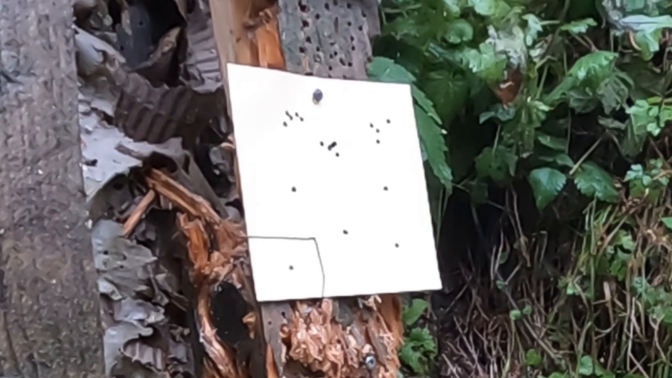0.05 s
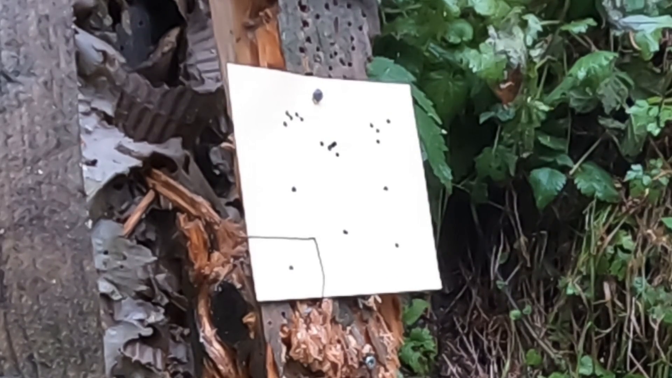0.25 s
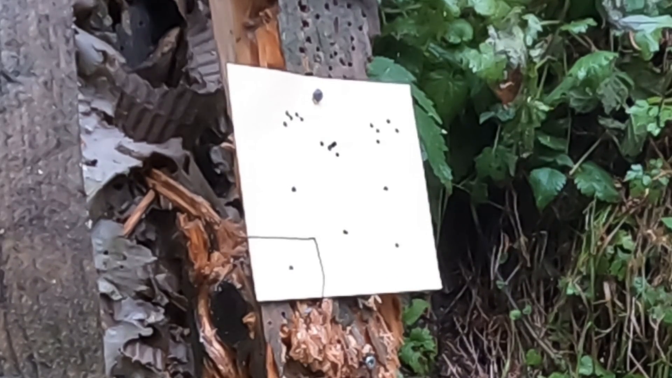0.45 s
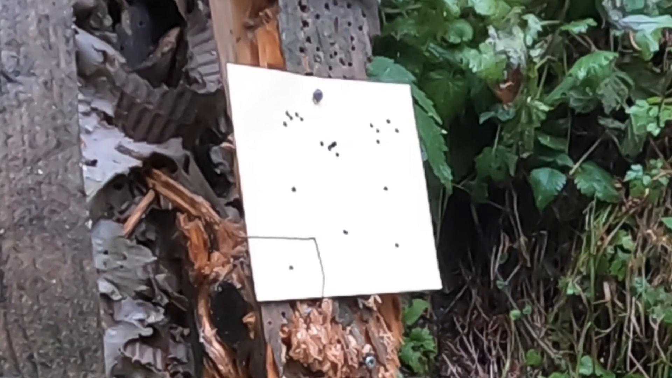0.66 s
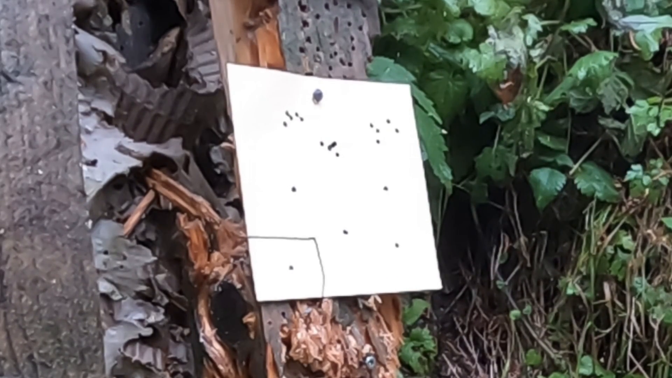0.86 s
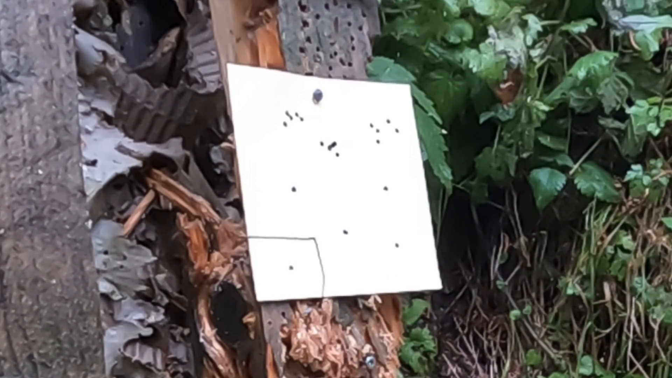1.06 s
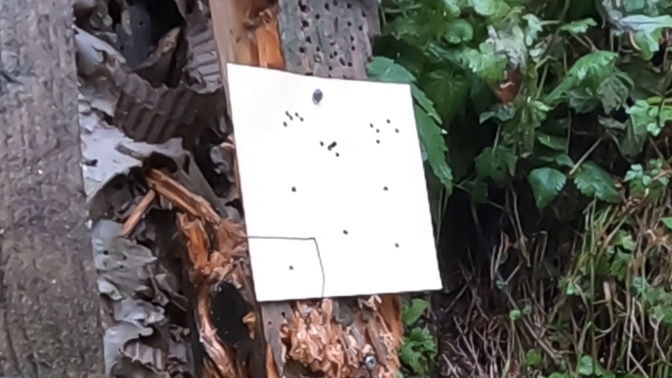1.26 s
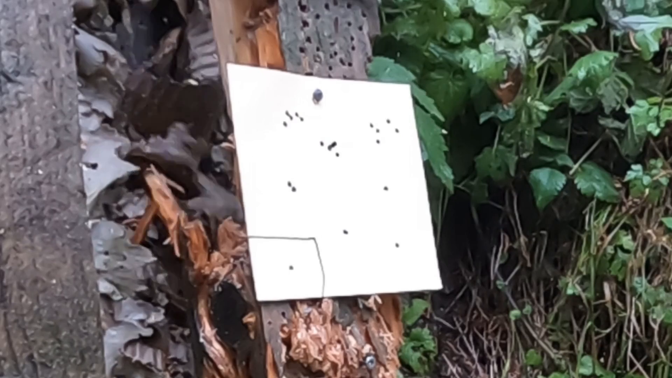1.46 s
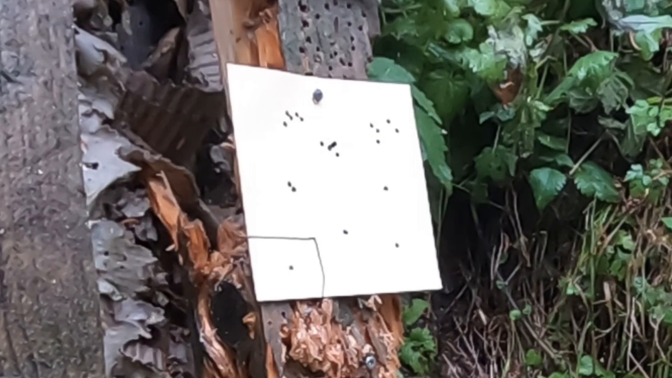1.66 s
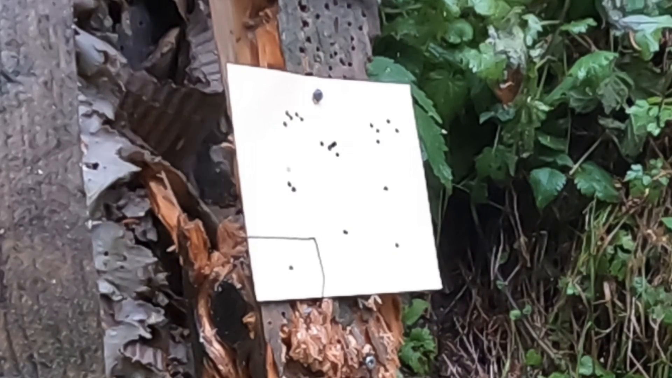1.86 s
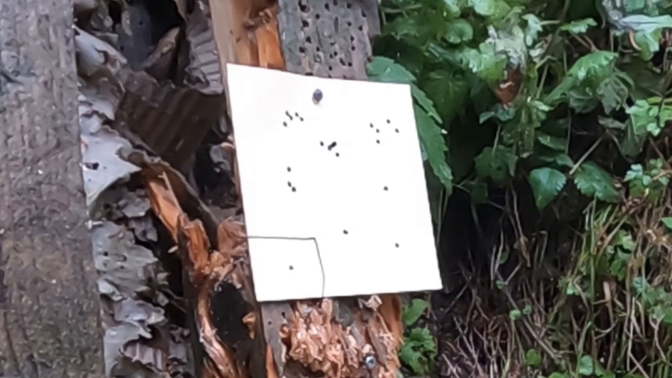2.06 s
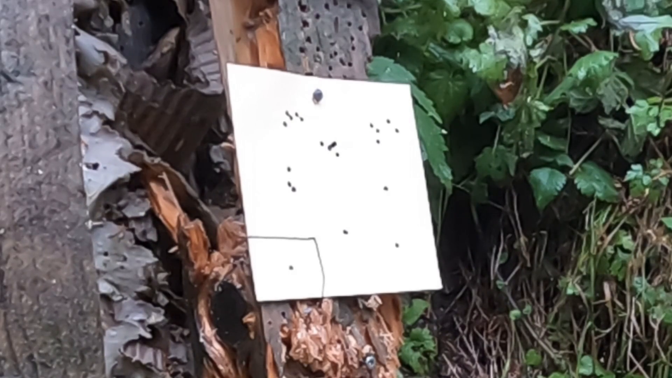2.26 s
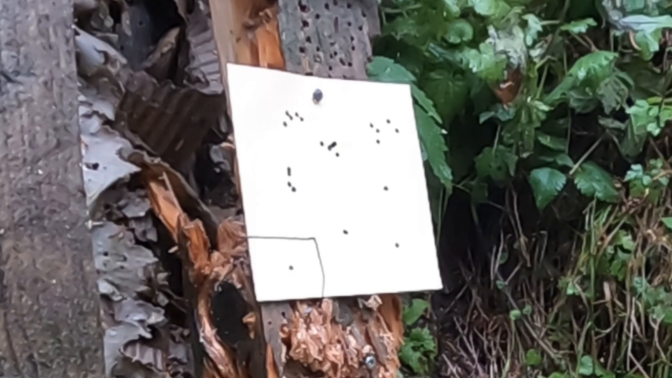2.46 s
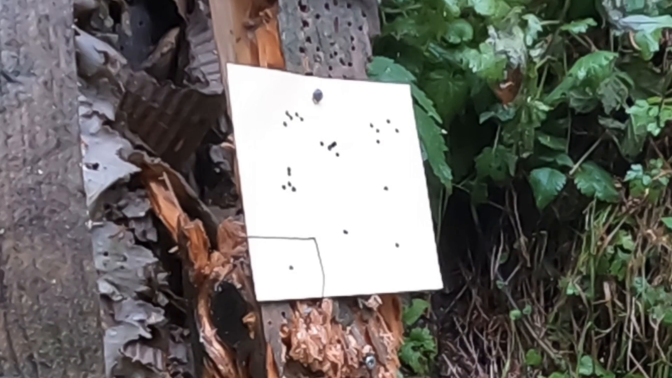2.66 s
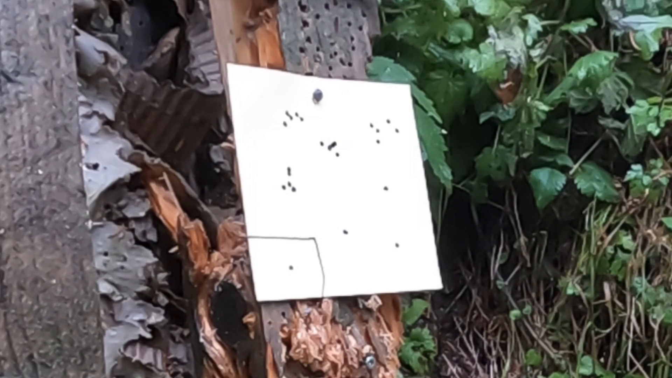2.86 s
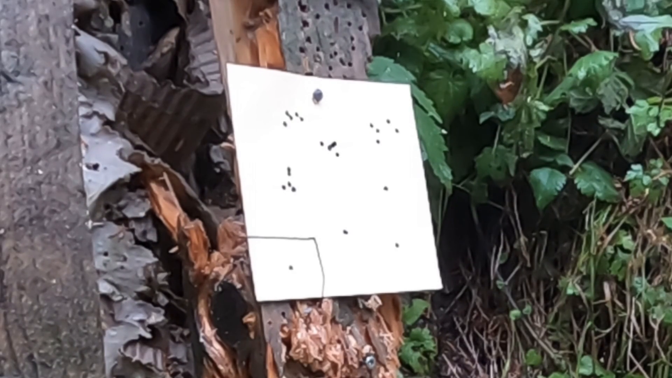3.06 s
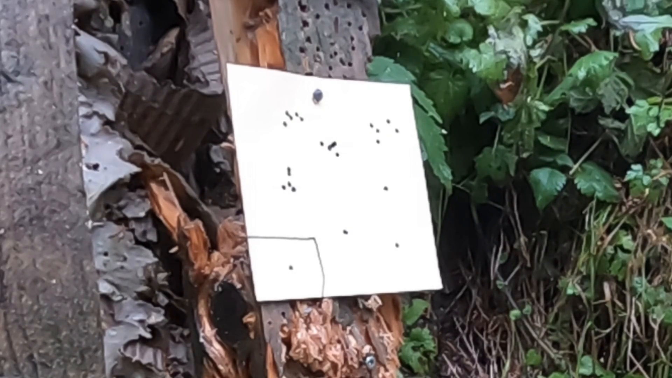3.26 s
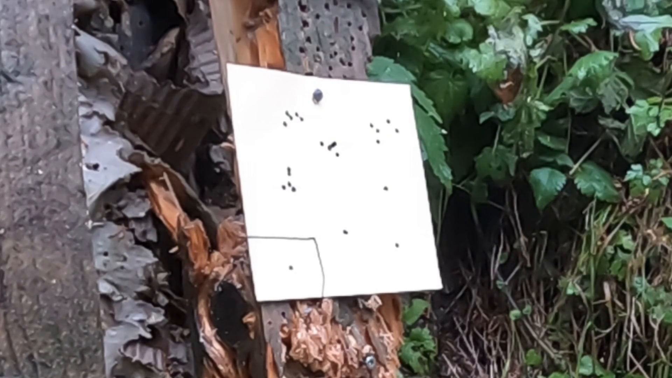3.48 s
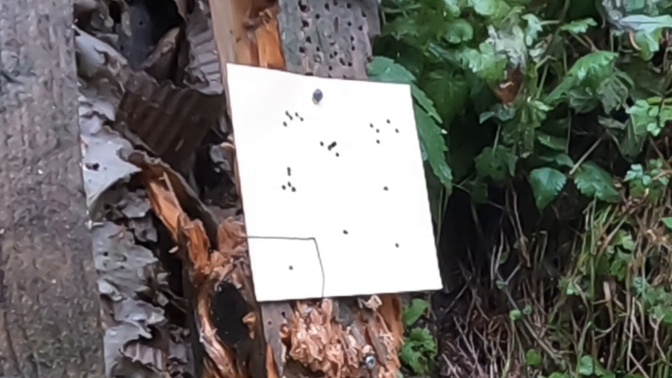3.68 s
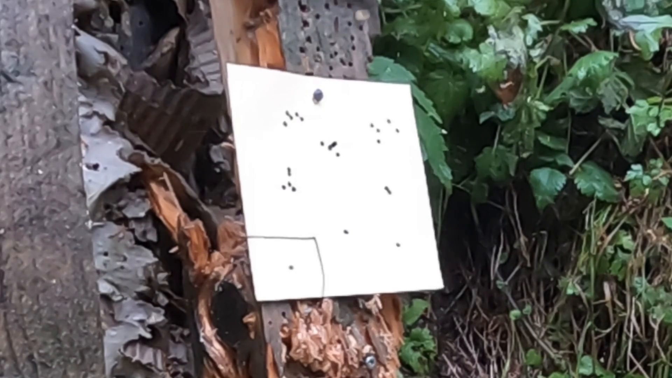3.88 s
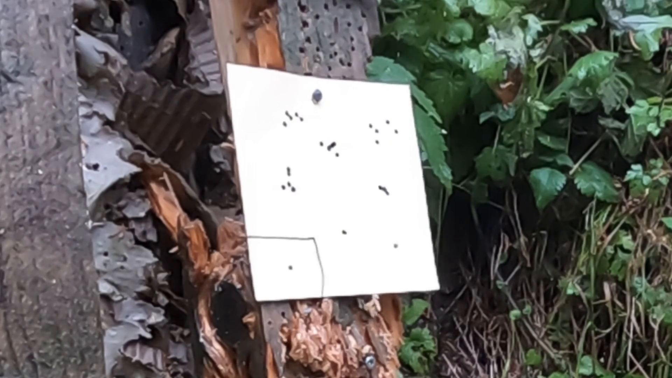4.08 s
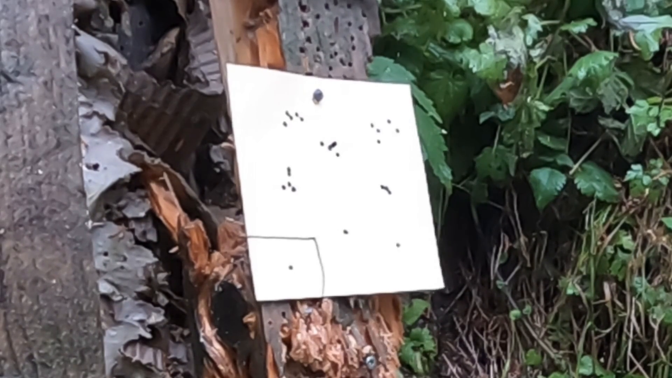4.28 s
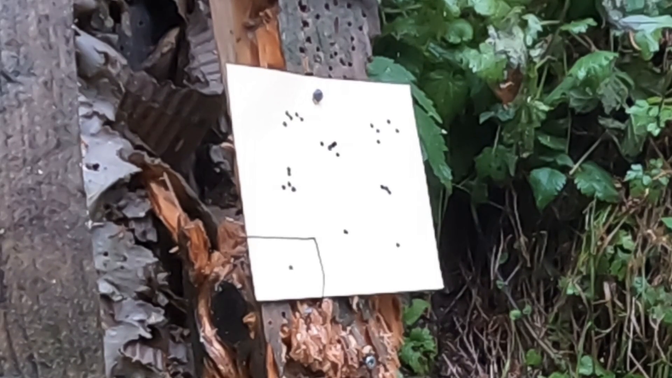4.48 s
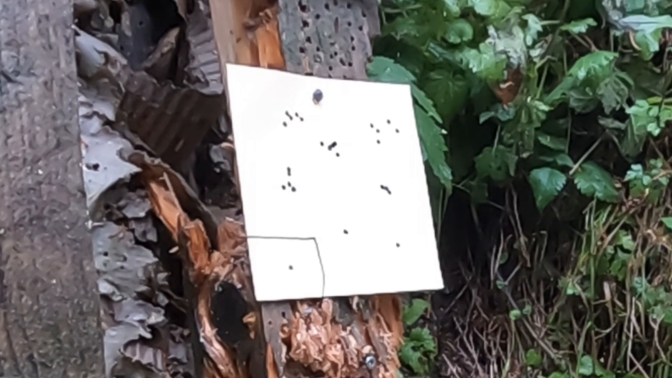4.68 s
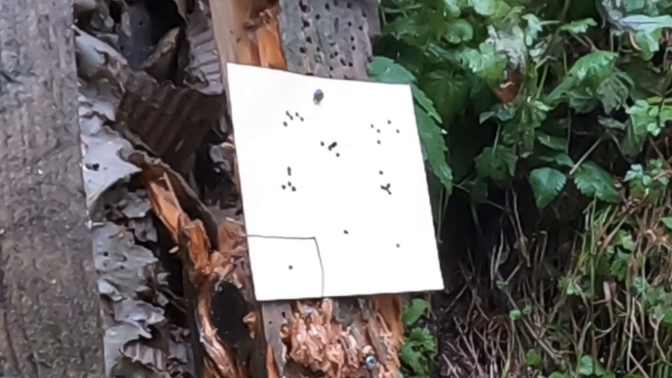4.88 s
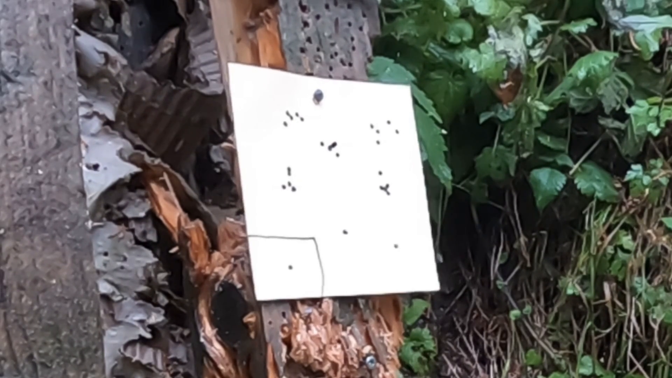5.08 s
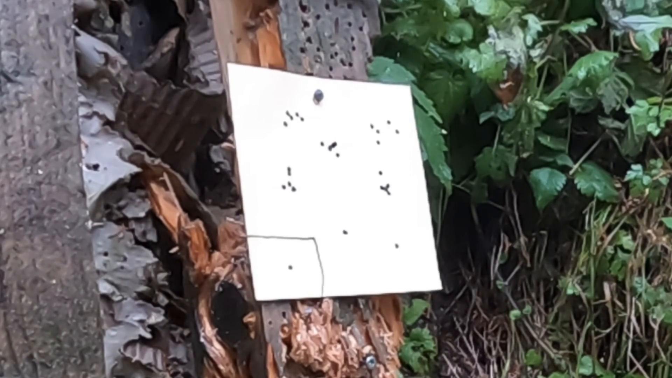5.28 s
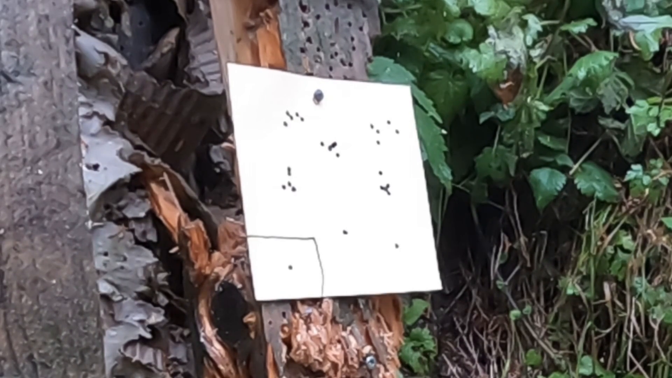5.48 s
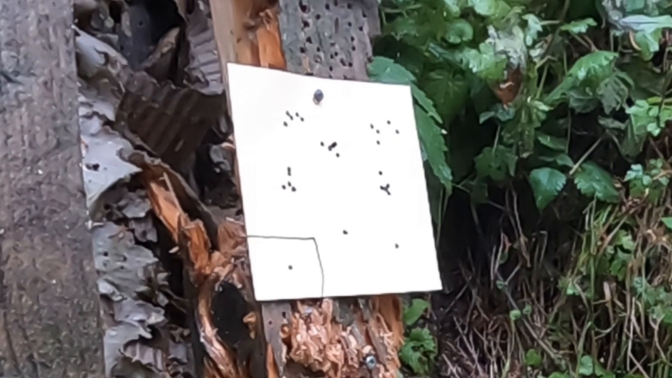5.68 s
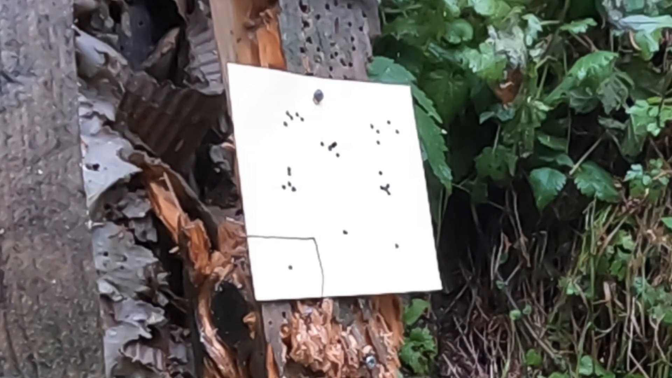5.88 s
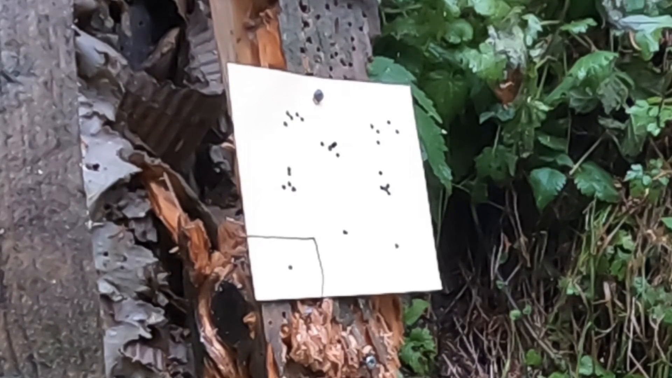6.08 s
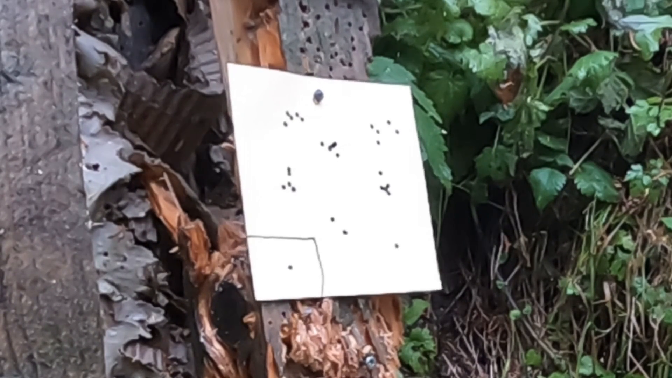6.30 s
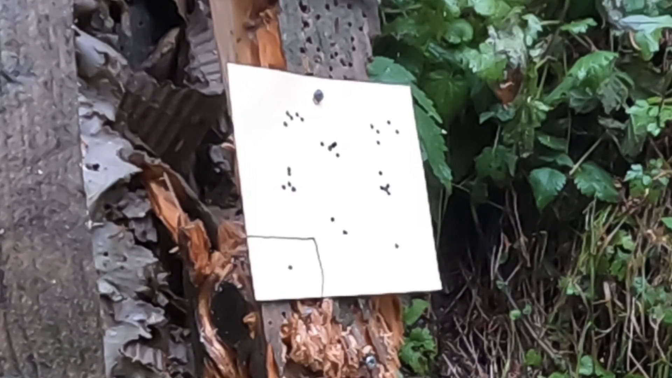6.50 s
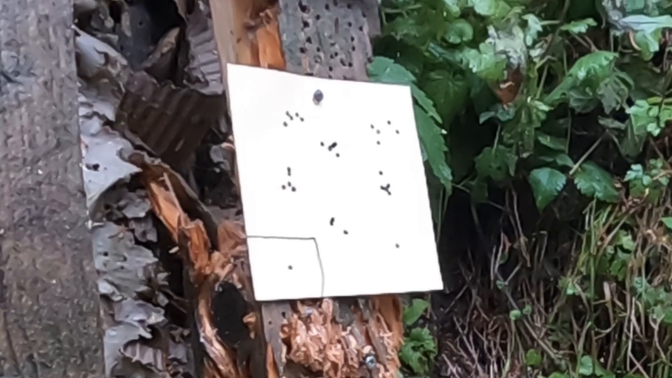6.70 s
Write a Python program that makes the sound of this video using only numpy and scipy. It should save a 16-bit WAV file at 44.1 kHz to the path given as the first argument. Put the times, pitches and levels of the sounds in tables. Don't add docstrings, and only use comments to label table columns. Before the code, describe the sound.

Outdoors by a wood, low traffic rumble and a faint leafy hush open the scene. Then nine air rifle pellets hit a card on a wooden post, unevenly spaced. Each is a small muzzle click followed almost at once by a loud, dry, splitting smack and a bright rustling echo from trees. The microphone is close to the post and overloads; background dips after hits and cuts abruptly.

```python
import sys
import numpy as np
from scipy import signal
from scipy.fft import rfft, irfft
from scipy.io import wavfile
from scipy.ndimage import uniform_filter1d

SR = 44100
rng = np.random.default_rng(int(sys.argv[2]) if len(sys.argv) > 2 else 0)


def to_wav(sig):
    pcm = np.clip(np.atleast_2d(sig), -1, 1) * 32767
    pcm = np.round(pcm).astype(np.int16)
    wavfile.write(sys.argv[1], SR, pcm.T)


def decibels_to_gain(level_db):
    exponent = np.asarray(level_db, float) / 20
    return 10 ** exponent


N = 297234
LEAD_S = 0.0098


# (pitch [Hz], level [dB], t60 [s])
POST_MODES = [(2060, -9, 0.0024), (2687, -5.5, 0.017), (3342, 3, .012), (3990, -1.5, 0.0045),
              (5085, -2.5, 0.01), (5980, -1.5, .008), (7128, 2, 0.0094), (8240, -7, 0.0018),
              (9800, -8.5, 0.0059), (10950, -7, 0.023)]


def smack(wood_hz, wood_db, card_db, split_db, spray):
    knocks = np.zeros(round(.06 * SR))
    at = np.sort(rng.integers(10, 180, size=9))
    splits = rng.uniform(0.057, 1.0, size=9) * rng.choice([-1, 1], size=9)
    knocks[[0, *at]] = [-1.6, *splits]
    knocks[round(.003 * SR)] = -2.0
    knocks[1:] *= decibels_to_gain(split_db)
    snap = knocks * (np.arange(len(knocks)) == 0)

    wood = np.array([ring(knocks, wood_hz * share, 0.03) for share in rng.uniform(.93, 1.1, size=2)])
    thud = ring(snap, wood_hz * 1.2, .003) - decibels_to_gain(-4.0) * ring(snap, wood_hz * 1.95, 0.0035)
    wood = decibels_to_gain(-2.5) * wood + decibels_to_gain(7.5) * thud
    wood[0] = np.roll(wood[0], round(.00007 * SR))

    out = decibels_to_gain(wood_db) * wood + decibels_to_gain(-1.0 + card_db + split_db) * spray
    out = out + decibels_to_gain(1.5) * ring(snap, 4500, 0.0012)
    out = out + decibels_to_gain(-1.0) * ring(snap, 9500, 0.0015) * decibels_to_gain([[2.5], [-2.5]])
    for hz, level_db, t60 in POST_MODES:
        chance_db = np.clip(rng.normal(0, 1.5, size=(2, 1)), -4, 4)
        out = out + decibels_to_gain(level_db - 10.5 + card_db + chance_db) * ring(knocks, hz, t60)

    bark = decibels_to_gain(-16.5) * ring(knocks, 520, 0.047)
    hollow = np.array([np.roll(bark, round(0.00041 * SR)), bark])
    return band(band(out, 1100, 10000), 860, 16000) + hollow


OPEN_DB, REACT_S, CRUSH_DB, CRUSH_S, FALL_DB_PER_S = 1, 0.00054, 37, .006, 618.5


def crush_db(t):
    late = np.maximum(t - REACT_S, 0)
    return OPEN_DB - CRUSH_DB * (1 - np.exp(-late / CRUSH_S)) - FALL_DB_PER_S * late


# (time [s], peak [dB], wood pitch [Hz], wood level [dB], card level [dB])
PELLET_HITS = [
    (1.5112, -3, 1346, -6, -0.8),
    (1.996, -3.5, 1006, 3.5, 1.5),
    (2.509, -8.5, 1461, -11, 0.9),
    (2.7846, -4.5, 1036, -1.5, -0.45),
    (3.9170, -7, 1431, 0, -1.5),
    (4.2031, -5.5, 1455, -2.5, 0.5),
    (4.9604, -7, 1698, -0.5, -3),
    (6.2403, -5.5, 1458, -2, -2),
    (6.7285, -4.5, 1553, -2.5, -1.5),
]
# (frequency [Hz], level [dB per Hz])
SPRAY_SPECTRUM = [(350, -31), (600, -12.5), (1230, -2), (2710, -8.5), (3880, -9), (5480, -7.5),
                  (7320, -7.5), (7850, -12.5), (11400, -12.5), (16300, -40)]
# (frequency [Hz], level [dB per Hz])
SMEAR_SPECTRUM = [(290, -30), (500, 0.5), (660, -6.5), (3330, -6), (4460, -9.5), (5470, -8), (7760, -5.5),
                  (8980, -11.5), (13300, -15), (16300, -37)]
# (frequency [Hz], level [dB per Hz])
WOBBLE_SPECTRUM = [(50, -20.5), (90, -6), (170, -5.5), (235, -2.5), (255, -29)]
WOBBLE_DB, SMEAR_DB = -27.5, -28.5


def pellets():
    direct, ghost = np.zeros((2, 2, N))
    recoil, smear, faint, wobble = np.zeros((4, N))
    spray = noise(SPRAY_SPECTRUM, alike=0.52)
    for k, (s, peak_db, wood_hz, wood_db, card_db) in enumerate(PELLET_HITS):
        recoil_db, copy_db, split_db = SHOTS[k][1:]
        own_spray = spray[:, k * 4000:][:, :round(.06 * SR)]
        sound = smack(wood_hz, wood_db, card_db, split_db, own_spray)
        add(direct, decibels_to_gain(peak_db) * sound, s)
        add(recoil, -decibels_to_gain(recoil_db) * np.hanning(round(.0068 * SR)), s + 0.00027)
        add(wobble, decibels_to_gain(WOBBLE_DB) * np.hanning(round(.024 * SR)), s - .017)
        early = band(sound[:, :round(LEAD_S * SR)], 980, 4000) * fade(0.024, LEAD_S)
        add(ghost, decibels_to_gain(copy_db) * early, s - LEAD_S)
        add(ghost, decibels_to_gain(copy_db - 12.5) * early, s - 2 * LEAD_S)
        add(smear, decibels_to_gain(SMEAR_DB) * fade(-0.08, LEAD_S), s - LEAD_S)
        add(faint, decibels_to_gain(SMEAR_DB - 13.0) * fade(-0.048, LEAD_S), s - 2 * LEAD_S)
        add(faint, decibels_to_gain(SMEAR_DB - 18.5) * fade(-.3, 2 * LEAD_S), s - 4 * LEAD_S)
    squeeze = after_hits(crush_db, rest_db=-200)
    haze = noise(SMEAR_SPECTRUM, alike=0.33)
    bright = (squeeze * direct + ghost + smear * haze + edge(faint * haze)) * decibels_to_gain([[1.1], [-1.1]])
    return bright + recoil + wobble * noise(WOBBLE_SPECTRUM, alike=0.42)


# (muzzle click time [s], post recoil [dB], early smack copy [dB], wood splitting [dB])
SHOTS = [
    (1.4656, -14.5, -20.5, -0.5),
    (1.9506, -10.5, -24, 1.5),
    (2.463, -14.5, -27.5, 1),
    (2.7399, -11, -30.5, 4.5),
    (3.8725, -16.5, -23.5, -5.5),
    (4.1582, -11.5, -29.5, -1),
    (4.9145, -17, -23.5, -2),
    (6.1962, -16, -32, -1.5),
    (6.6843, -15.5, -26, -2.5),
]
# (frequency [Hz], level [dB per Hz])
SCATTER_SPECTRUM = [(470, -42.5), (800, -21), (1260, -3), (1860, -11), (3590, 0), (7560, -5), (9020, -23),
                    (12100, -18.5), (13700, -29.5), (16300, -80)]
MUZZLE_DB = -19
CUT_SHOT_S, CUT_SHOT_DB = .3642, -48


def muzzles():
    clicks, scatter = np.zeros(N), np.zeros(N)
    for s, *_ in SHOTS:
        for lag_s, echo_db in [(0, 0), (.003, -6.), (-LEAD_S, -27.)]:
            clicks[round((s + lag_s) * SR)] -= decibels_to_gain(MUZZLE_DB + echo_db - 2.0)
        add(scatter, decibels_to_gain(MUZZLE_DB - 17.0) * fade(0.12, 0.038), s + 0.00084)
        add(scatter, decibels_to_gain(MUZZLE_DB - 45.5) * fade(4.9, LEAD_S), s - LEAD_S)
        add(scatter, decibels_to_gain(MUZZLE_DB - 45.0) * fade(9., LEAD_S), s - 2 * LEAD_S)
    clicks[round(CUT_SHOT_S * SR)] -= decibels_to_gain(CUT_SHOT_DB)
    clicks[round((CUT_SHOT_S - LEAD_S) * SR)] -= decibels_to_gain(CUT_SHOT_DB - 15.0)
    crack = decibels_to_gain(3.0) * ring(clicks, 4600, 0.0018) + decibels_to_gain(-31.0) * ring(clicks, 1300, 0.0018)
    return (band(crack, 500, 8000) + scatter * noise(SCATTER_SPECTRUM, alike=0.69)) * decibels_to_gain([[2.2], [-2.2]])


TREES_DB, NEAR_DB, NEAR_S, THIN_DB_PER_S = -59, -11.5, .012, 15
CLEARING_S, CLEARING_WIDE_S, CLEARING_DB = .055, 0.01, 3.5


def echo_db(t):
    clearing = np.exp(-((t - CLEARING_S) / CLEARING_WIDE_S) ** 2)
    return TREES_DB + NEAR_DB * np.exp(-t / NEAR_S) - THIN_DB_PER_S * t - CLEARING_DB * clearing


# (frequency [Hz], level [dB per Hz])
TREE_SPECTRUM = [(790, -37), (1350, -6), (1420, -9.5), (1730, -3), (1980, -8), (2430, -4.5), (6710, -9),
                 (12000, -22.5), (14500, -33)]


def trees():
    level = after_hits(echo_db, rest_db=-200)
    level[:round(SPLICES_HEARD[0][0] * SR)] = decibels_to_gain(-61.0)
    return level * noise(TREE_SPECTRUM, alike=0.56) * decibels_to_gain([[1.1], [-1.1]])


# (time [s], level [dB], t60 [s])
SPLINTERS = [
    (1.6915, -25.5, 0.043),
    (1.5, -35, 0.044),
    (1.655, -68, .02),
]
# (frequency [Hz], level [dB per Hz])
SPLINTER_SPECTRUM = [(240, -47), (400, -16.5), (1130, -3.5), (1630, -1.5), (2120, -3.5), (3690, -12.5),
                     (5350, -3.5), (7170, -4.5), (12100, -28), (16000, -65)]


def splinters():
    level = np.zeros(N)
    for s, level_db, t60 in SPLINTERS:
        end = min(c for c, jump in SPLICES_HEARD if c > s)
        add(level, decibels_to_gain(level_db) * fade(t60, end - s), s)
    return level * noise(SPLINTER_SPECTRUM, alike=0.5) * decibels_to_gain([[1.5], [-1.5]])


# (time [s], length [s], from pitch [Hz], to pitch [Hz], level [dB])
BIRD_CALLS = [
    (.372, .18, 4235, 4200, -91),
    (.57, .05, 6720, 6600, -80),
    (2.16, .085, 4050, 4125, -96),
    (2.25, .11, 5400, 4550, -92),
    (3.62, .08, 6780, 6700, -93),
    (4.82, .095, 5480, 4420, -83),
]
# (time [s], length [s], from pitch [Hz], to pitch [Hz], level [dB])
ENGINE_NOTES = [
    (4.73, 0.12, 223, 215, -58),
    (5.4, .12, 264.5, 256, -56.5),
]
GLIDE_BEND, WAVER = 1.4, 0.00575
GLIDE_ATTACK, NOTE_ATTACK = 0.69, .15


def whistles(calls, flutter_s):
    out, t = np.zeros(N), np.arange(N) / SR
    flutter = 0.86 + 0.48 * wander(flutter_s)
    waver = 1 + WAVER * wander(flutter_s)
    for s, length_s, from_hz, to_hz, level_db in calls:
        left_to_fall = np.clip(1 - (t - s) / length_s, 0, 1) ** GLIDE_BEND
        hz = to_hz + (from_hz - to_hz) * left_to_fall
        attack = GLIDE_ATTACK if from_hz > 1.1 * to_hz else NOTE_ATTACK
        tone = np.sin(2 * np.pi * np.cumsum(hz * waver) / SR)
        out += swell(s, length_s, attack) * decibels_to_gain(level_db + 8.5) * tone
    return out * flutter


REST_DB, DUCK_DB, DUCK_S, HOLD_S, CLIMB_DB_PER_S = 1.5, 12, 0.014, 0.14, 99.5


def duck_db(t):
    return REST_DB - DUCK_DB * (1 - np.exp(-t / DUCK_S)) + CLIMB_DB_PER_S * np.maximum(t - HOLD_S, 0)


# (time [s], length [s], level [dB])
LEAF_STIRS = [(.16, .04, -86), (0.36, 0.23, -80), (0.562, 0.23, -75.5), (1.15, .06, -94), (2.999, .3, -101),
              (3.36, .2, -85.5), (3.622, 0.32, -91), (4.362, 0.38, -96), (5.18, .06, -93),
              (5.58, 0.091, -88), (5.75, 0.47, -87), (6.341, 0.35, -91.5)]
# (frequency [Hz], level [dB per Hz])
LEAF_SPECTRUM = [(4300, -24.5), (5000, -4), (6800, 0.5), (7700, -4.5), (8300, -25)]
# (frequency [Hz], level [dB per Hz])
STILL_SPECTRUM = [(1760, -32), (3000, -4), (7150, -2.5), (8700, -16), (11000, -23), (16000, -25.5)]
STILL_DB, LEAF_REST_DB = -88.5, -100


def leaves():
    stir = decibels_to_gain(LEAF_REST_DB)
    stir = stir + sum(decibels_to_gain(db) * swell(s, length_s, attack=0.16) for s, length_s, db in LEAF_STIRS)
    patchy = decibels_to_gain(2.0 * wander(.04))
    return stir * patchy * noise(LEAF_SPECTRUM) + decibels_to_gain(STILL_DB) * noise(STILL_SPECTRUM)


def cricket():
    t = np.arange(N) / SR - .105 + .015 * wander(.15)
    throb = np.maximum(np.cos(2 * np.pi * 8.1 * t), 0) ** 2
    shrill = noise([(11400, -18.5), (11900, -0.5), (12400, -20.0)], alike=0.27)
    return decibels_to_gain(-93 + 3.0 * wander(.08)) * throb * shrill


# (time [s], road rumble [dB], far engine [dB])
TRAFFIC_LEVELS = [(0, -46, -81.5), (.15, -37.5, -79.5), (1.2, -39, -77.5), (1.75, -39.5, -78),
                  (2.4, -39, -74.5), (2.7, -39.5, -70), (3.06, -42.5, -78.5), (3.3, -39, -77.5),
                  (3.9, -37, -72.5), (4.8, -38.5, -67), (5.17, -37, -71.5), (5.35, -41, -61),
                  (5.8, -38, -62), (6.2, -39, -62.5), (6.74, -40.5, -58.5)]
# (frequency [Hz], level [dB per Hz])
RUMBLE_SPECTRUM = [(8.8, -35), (15, -6.5), (38, 0.5), (54, 3.5), (73, -3.5), (92, -14.5), (100, -15),
                   (130, -51), (220, -120)]
# (frequency [Hz], level [dB per Hz])
DRONE_SPECTRUM = [(59, -29), (100, -1), (122, 4), (156, -7), (240, -11), (310, -38.5), (530, -120)]
# (frequency [Hz], level [dB per Hz])
HISS_SPECTRUM = [(200, -29.5), (340, -2.5), (396, -1), (541, -5), (740, -4), (1170, -1.5), (2510, -32),
                 (3250, -38), (4500, -37.5), (5850, -62.5), (9900, -120)]
# (frequency [Hz], level [dB per Hz])
ENGINE_SPECTRUM = [(235, -27), (250, 0), (290, -5), (340, -4), (360, -33)]
HISS_DB, DRONE_DB, DRONE_FOLLOWS = -62, -56, .25
RUMBLE_DUCK, DRONE_DUCK = 0.28, .3


def background():
    rumble = noise(RUMBLE_SPECTRUM)
    own_swell = np.sqrt(uniform_filter1d(np.mean(rumble ** 2, 0), round(.06 * SR)) + 0.29)
    rumble = rms_one(rumble / own_swell)
    rumble_db, engine_db = in_time(TRAFFIC_LEVELS)
    drone_db = DRONE_DB + DRONE_FOLLOWS * (engine_db - engine_db.mean())
    duck = after_hits(duck_db, REST_DB)
    road = decibels_to_gain(engine_db) * noise(ENGINE_SPECTRUM) + decibels_to_gain(HISS_DB) * noise(HISS_SPECTRUM)
    low = duck ** RUMBLE_DUCK * decibels_to_gain(rumble_db) * rumble
    low = low + duck ** DRONE_DUCK * decibels_to_gain(drone_db) * noise(DRONE_SPECTRUM)
    left, right = (low + duck * (road + leaves() + cricket())) * decibels_to_gain([[.6], [-.6]])
    return np.array([np.roll(left, 1), right])


def rms_one(x):
    return x / np.sqrt(np.mean(x ** 2) + 1e-20)


def in_time(rows):
    s, *columns = np.transpose(rows)
    return [np.interp(np.arange(N) / SR, s, c) for c in columns]


# (frequency [Hz], likeness [0-1])
OPEN_AIR_LIKENESS = [(60, 0.98), (180, 0.8), (550, 0.51), (1650, 0.6), (4970, 0.099), (15000, 0.42)]


def noise(spectrum, alike=None):
    log_hz = np.log(np.maximum(np.fft.rfftfreq(N, 1 / SR), 1))
    hz, db = np.transpose(spectrum)
    gain = decibels_to_gain(np.interp(log_hz, np.log(hz), db, left=-99, right=-99))
    if alike is None:
        hz, likeness = np.transpose(OPEN_AIR_LIKENESS)
        alike = np.interp(log_hz, np.log(hz), likeness)
    mid, side = rfft(rng.standard_normal((2, N))) * gain
    return rms_one(irfft(np.sqrt(1 + alike) * mid + np.sqrt(1 - alike) * side * [[1], [-1]], N))


def ring(clicks, hz, t60):
    r, w = decibels_to_gain(-60 / (t60 * SR)), 2 * np.pi * hz / SR
    return signal.lfilter([0, np.sin(w)], [1, -2 * r * np.cos(w), r * r], clicks + 1e-18)


def add(out, sound, s):
    i = round(s * SR)
    out[..., i:i + sound.shape[-1]] += sound[..., :N - i]


def fade(t60, length_s):
    return decibels_to_gain(-60 * np.arange(round(length_s * SR)) / SR / t60)


def swell(s, length_s, attack):
    out, t = np.zeros(N), np.arange(round(length_s * SR)) / SR
    gate = np.clip(np.minimum(t, length_s - t) / .01, 0, 1)
    rise_db = np.interp(t, [0, attack * length_s, length_s], [-8.5, 0, -8.5])
    add(out, gate * decibels_to_gain(rise_db), s)
    return out


def wander(slow_s):
    width = round(slow_s * SR)
    return rms_one(uniform_filter1d(uniform_filter1d(rng.standard_normal(N), width), width))


def after_hits(shape_db, rest_db):
    out = np.full(N, float(rest_db))
    for hit in PELLET_HITS:
        end = min([c for c, jump in SPLICES_HEARD if c > hit[0]] + [N / SR])
        span = slice(round(hit[0] * SR), round(end * SR))
        out[span] = shape_db(np.arange(span.stop - span.start) / SR)
    return decibels_to_gain(out)


def band(x, low_hz, high_hz):
    return signal.sosfilt(signal.butter(2, [low_hz, high_hz], "band", fs=SR, output="sos"), x)


def edge(x):
    return signal.sosfilt(signal.cheby2(8, 40, 14300, fs=SR, output="sos"), x)


def scene():
    near = pellets()
    far = whistles(BIRD_CALLS, 0.0047) * decibels_to_gain([[1.5], [-1.5]]) + whistles(ENGINE_NOTES, 0.3)
    return near + edge(muzzles() + splinters()) + trees() + far + background()


def band_limit(x):
    return signal.sosfilt(signal.butter(12, 16480, fs=SR, output="sos"), x)


# (time [s], jump of the wave [full scale])
SPLICES_HEARD = [(.01492, -.007), (.36492, .009), (1.71492, .001), (2.14825, .002), (2.59825, -.011),
                 (2.96492, -.0005), (3.94825, -.035), (4.34825, -.026), (4.73159, .004), (5.14825, -.028),
                 (6.33159, -.028)]


def record(dry):
    steps = np.zeros(N)
    for s, jump in SPLICES_HEARD:
        add(steps, jump * fade(0.031, .05), s + 1 / SR)
    flattened = np.clip(dry, -.95, .95)
    soft_top = signal.sosfilt(signal.cheby2(10, 45, 16600, fs=SR, output="sos"), flattened)
    return band_limit(np.clip(soft_top + steps, -1, 1))


dry = scene()
out = record(dry)
to_wav(out)
```